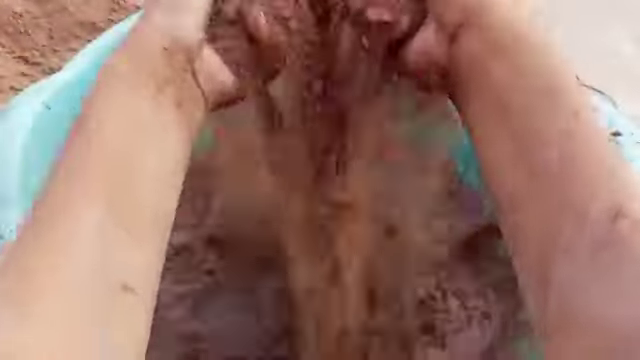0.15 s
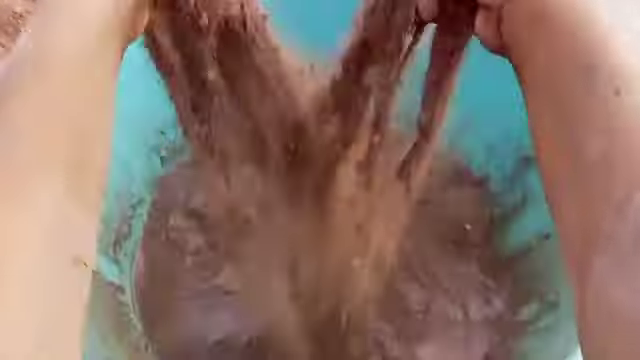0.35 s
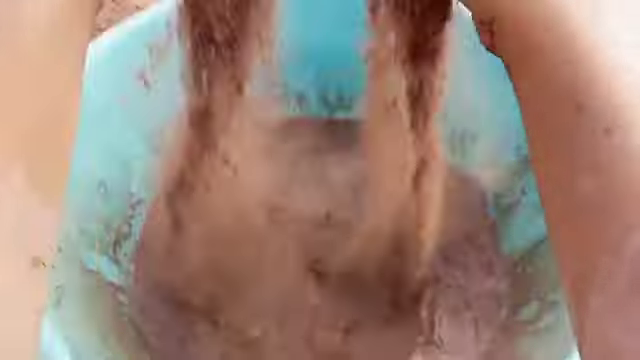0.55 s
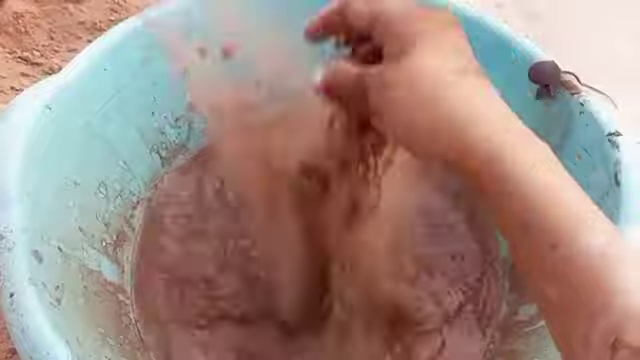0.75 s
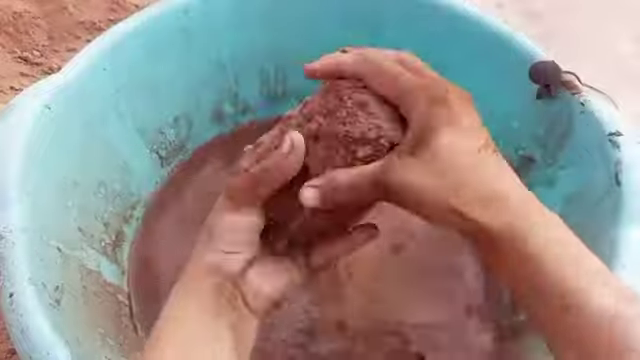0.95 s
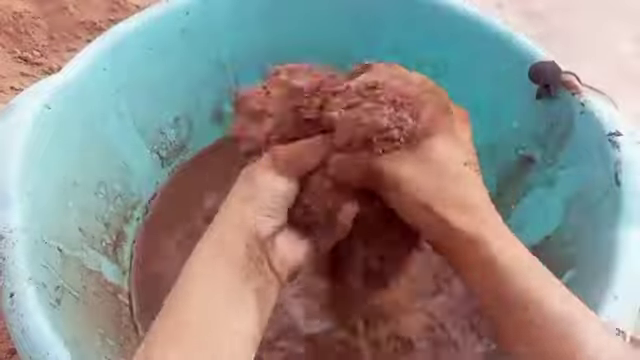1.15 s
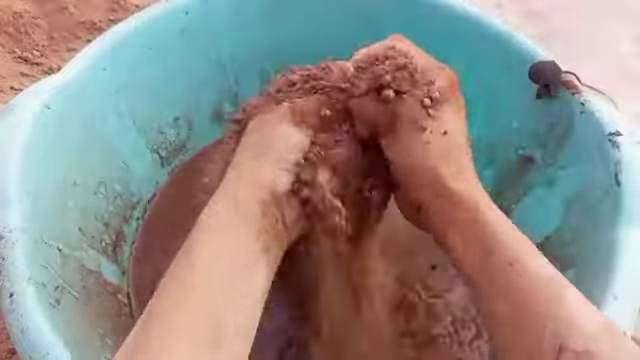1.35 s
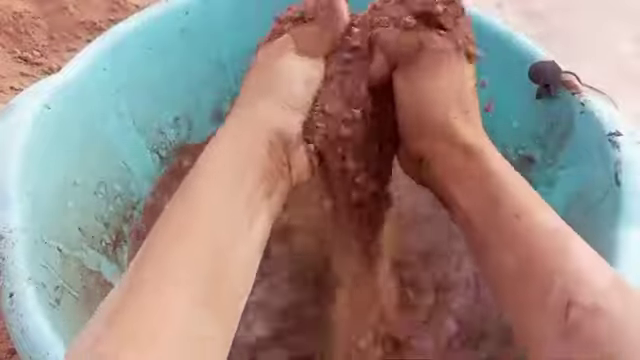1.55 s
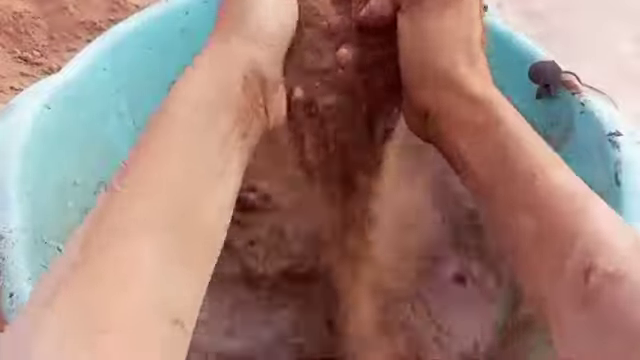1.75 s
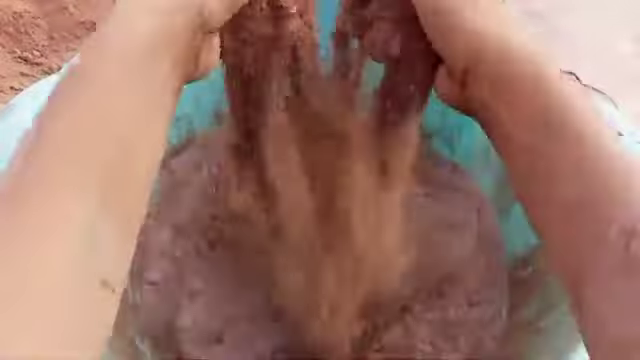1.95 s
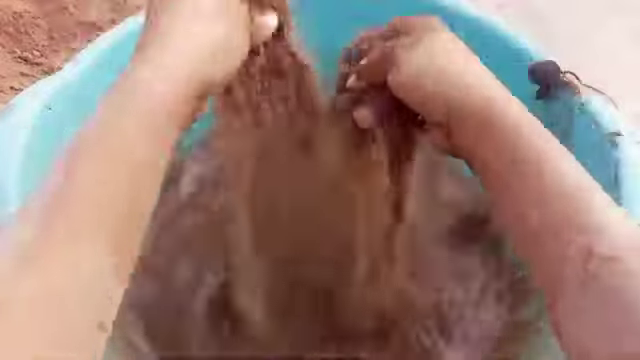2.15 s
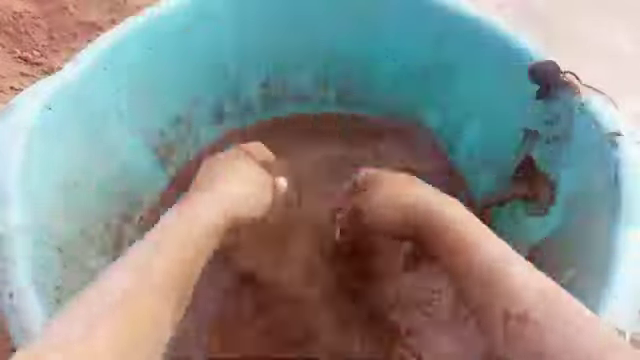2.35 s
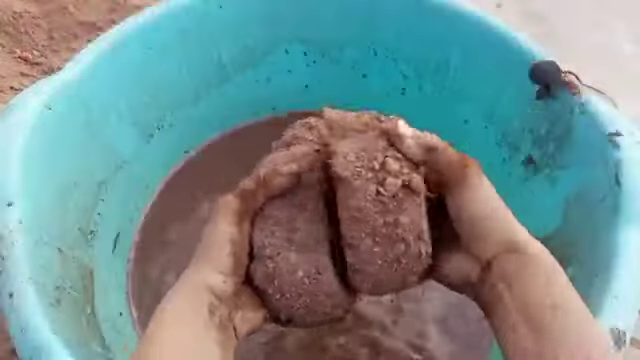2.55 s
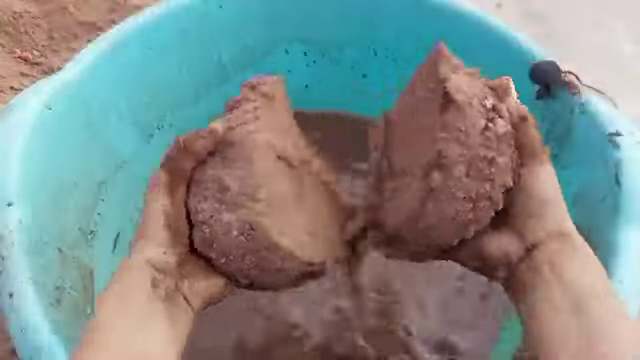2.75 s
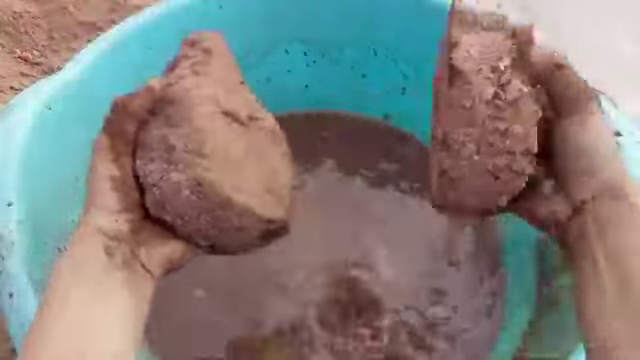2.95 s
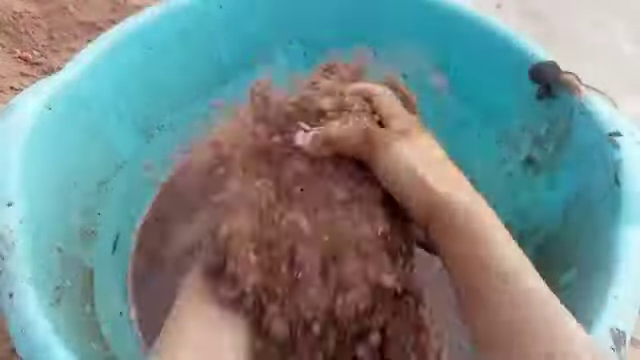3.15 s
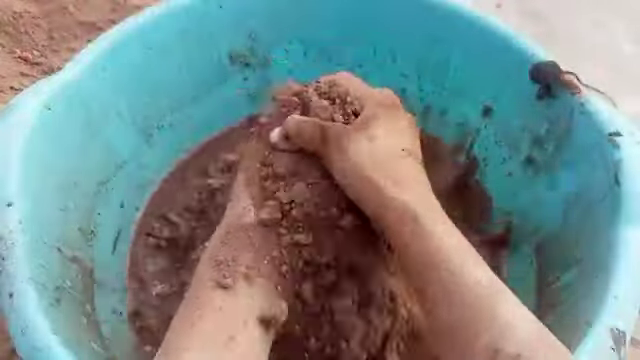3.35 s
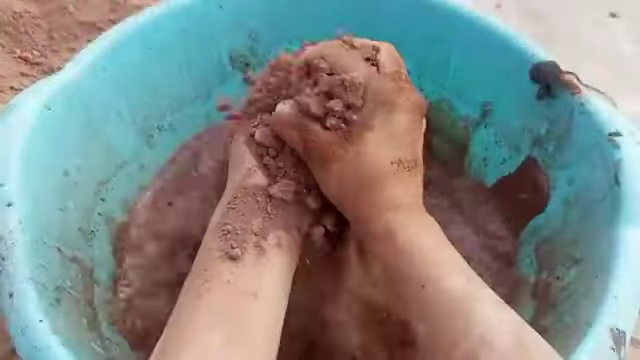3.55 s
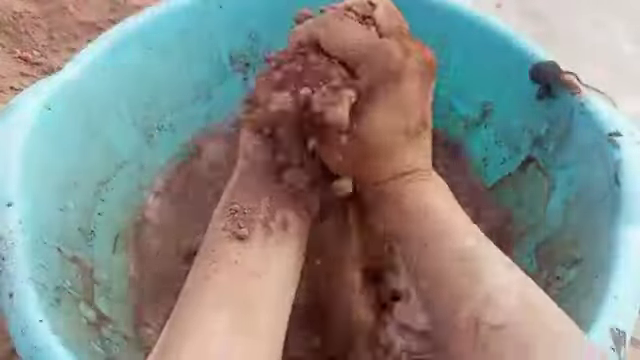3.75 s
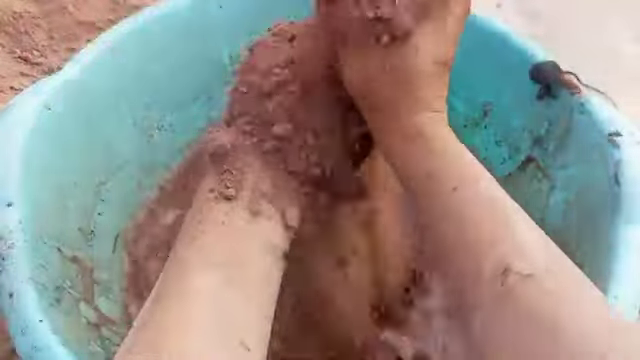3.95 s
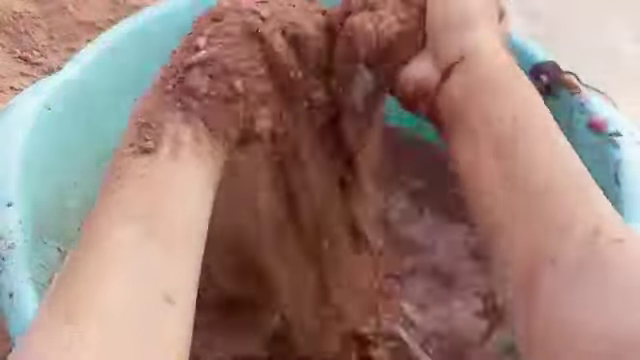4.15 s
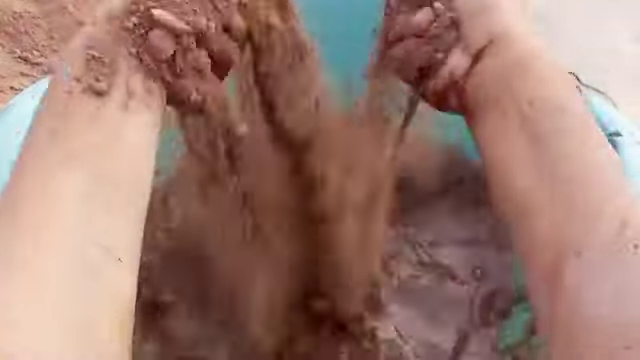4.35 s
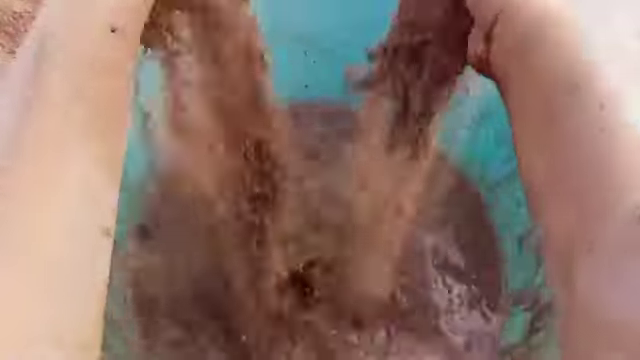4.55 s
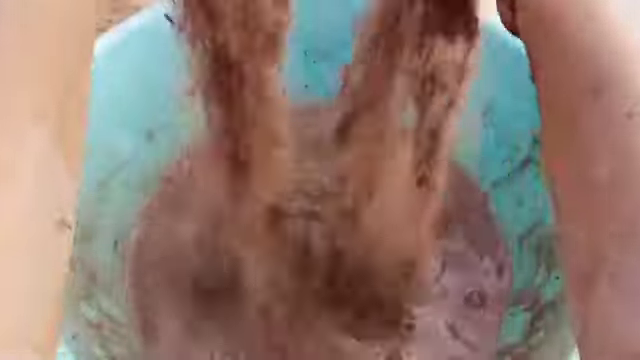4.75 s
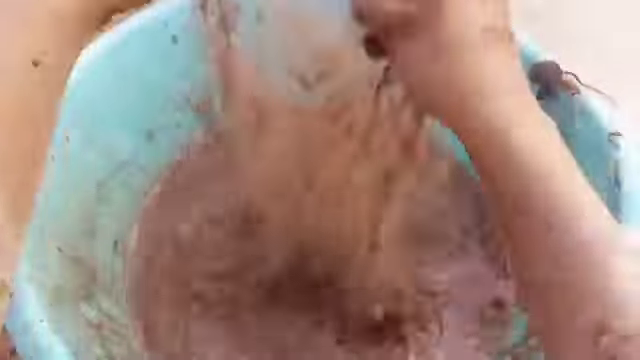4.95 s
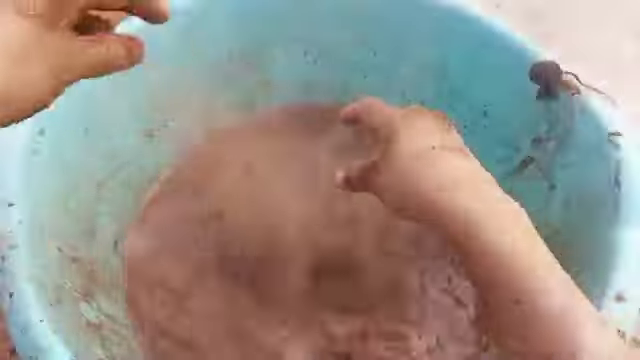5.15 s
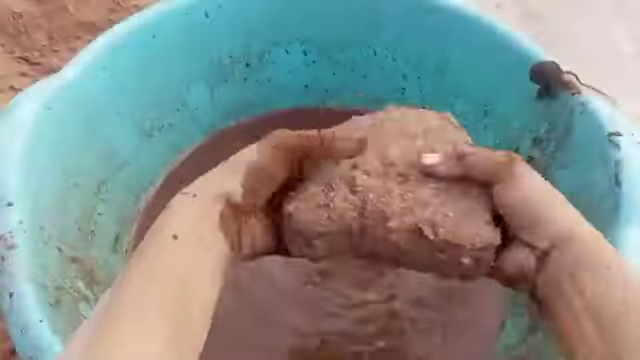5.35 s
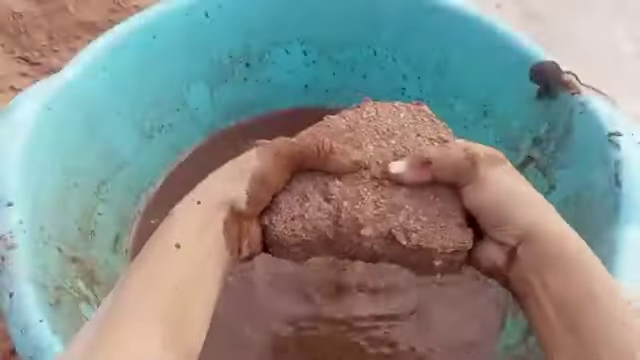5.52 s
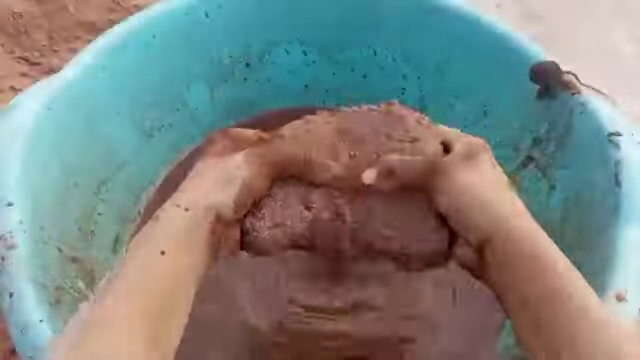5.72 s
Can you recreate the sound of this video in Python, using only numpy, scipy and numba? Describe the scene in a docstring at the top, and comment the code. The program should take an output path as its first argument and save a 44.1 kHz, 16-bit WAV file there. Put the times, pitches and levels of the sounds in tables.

```python
"""At a plastic tub of muddy water, two hands crush lumps of wet gritty sand close to the microphone.
Snapping lumps and rubbing sand are bursts and streams of filtered random grain ticks.
Sand pours into the water: swelling, dying sines make the bubbles, which gurgle, fizz and ring in the tub.
Just past half-way a whole lump plops in: a slap, throbbing air pockets, decaying noise for wash and spray."""
import sys
import numpy as np
from scipy import signal
from scipy.fft import rfft, irfft
from scipy.io import wavfile
from scipy.ndimage import uniform_filter1d, map_coordinates
from numba import njit

SR = 44100
rng = np.random.default_rng(int(sys.argv[2]) if len(sys.argv) > 2 else 0)


def to_wav(s):
    """Save 16-bit WAV."""
    ch = np.atleast_2d(s).T  # columns
    pcm = np.round(np.clip(ch, -1, 1) * 32767)  # PCM
    wavfile.write(sys.argv[1], SR, pcm.astype(np.int16))


N = 259308
CUTOFF_HZ = 15150

# Colour of sand grains rubbing. Each row: frequency in Hz, relative spectral level in dB.
GRIT_COLOUR = [(300, -29), (1000, -0.5), (3000, -1.5), (6200, 4), (8200, -0.5), (9600, 11.5), (10700, 7),
               (12000, -2), (13800, -5), (14900, 3), (15600, 6.5)]
# Colour of fine sand and small bubbles. Each row: frequency in Hz, relative spectral level in dB.
FIZZ_COLOUR = [(900, -12.5), (1700, 0.5), (2300, -4), (3300, 1), (5900, 0), (6800, -3), (8000, -14),
               (9900, -6), (12500, -24), (14900, -8.5)]
# Slap and throbbing air pockets of the whole lump. Each row: start in seconds, initial pitch in Hz,
# envelope peak in dB, swell time in seconds, pitch rise per swell time as a fraction.
PLOP_PARTS = [(3.2752, 1300, -0.5, 0.00044, 0.012), (3.2750, 710, -3, 0.0012, 0.011),
              (3.274, 144, -21.5, 0.0069, 0.00032), (3.273, 72, -22.5, 0.0036, 0.0),
              (3.2772, 297, 2.5, 0.0028, 0.017), (3.297, 321, -14.5, 0.007, 0.012),
              (3.332, 270, -21.5, 0.0071, 0.016)]


def from_db(db):
    """Decibels to gain."""
    return 10 ** (np.asarray(db) / 20)


def rms_one(x):
    """Scale to unit rms."""
    return x / np.sqrt(np.mean(x ** 2) + 1e-20)


def white_noise():
    """Gaussian noise over the whole scene."""
    return rng.standard_normal(N)


def filtered(x, kind, hz, order=2):
    """Butterworth filter; kind is low, high or band."""
    return signal.sosfilt(signal.butter(order, hz, kind, fs=SR, output="sos"), x)


def curve(table):
    """Interpolate rows of (seconds, value) to one value per sample."""
    s, values = np.transpose(table)
    return np.interp(np.arange(N) / SR, s, values)


def gain_at(colour, hz):
    """Gain of a colour at the given frequencies, interpolated over log frequency."""
    knots_hz, db = np.transpose(colour)
    return from_db(np.interp(np.log(hz + 1), np.log(knots_hz), db))


def coloured(x, colour, size=1024):
    """Causal (minimum-phase) filter with the given colour, built from its cepstrum; rms 1."""
    cepstrum = irfft(np.log(gain_at(colour, np.fft.rfftfreq(size, 1 / SR))))
    cepstrum[1:size // 2] *= 2
    cepstrum[size // 2 + 1:] = 0
    impulse = irfft(np.exp(rfft(cepstrum)))
    return rms_one(signal.fftconvolve(x, impulse)[:N])


def drift(per_s):
    """Random wander of rms 1 through per_s random values a second."""
    position = np.arange(N) / SR * per_s
    return rms_one(np.interp(position, np.arange(N), rng.standard_normal(N)))


def evened(x, window_s=0.066):
    """Hold a stream of grains near rms 1 while its fine texture stays."""
    size = int(window_s * SR / 2) + 1
    power = uniform_filter1d(uniform_filter1d(x ** 2, size), size)
    return x / np.sqrt(np.abs(power) + 1e-3 * np.mean(x ** 2))


def fall(start_s, length_s):
    """Envelope of one fall of sand: fast attack, sagging hold, release that is steeper for short falls."""
    attack_s, sag_db_per_s = 0.014, 14
    release_db_per_s = 260 * np.sqrt(0.1 / length_s)   # 260 for a fall of 0.1 s
    age_s = np.maximum(np.arange(N) / SR - start_s, 0)
    loss_db = sag_db_per_s * age_s + release_db_per_s * np.maximum(age_s - length_s, 0)
    return np.minimum(age_s / attack_s, 1) * from_db(-np.minimum(loss_db, 120))


def after_plop(decay_s):
    """Exponential decay from the slap of the whole lump."""
    age_s = np.arange(N) / SR - PLOP_PARTS[0][0]
    return (age_s > 0) * np.exp(-np.abs(age_s) / decay_s)


def swell_time(hz):
    """Swell time in seconds: the larger the bubble, the longer it rings."""
    return 0.0016 * (1450 / hz) ** 0.82


@njit
def ring_bubbles(start_s, hz, height, swell_s, rise, sharpness):
    """Each bubble is a sine that swells as it pinches off, dies away and shifts in pitch by its rise."""
    out = np.zeros(N)
    for k in range(len(start_s)):
        first = int(start_s[k] * SR)
        last = min(first + int(swell_s[k] * SR * (3 + 7 / sharpness)), N)
        for i in range(max(first, 0), last):
            age = (i - first) / SR / swell_s[k]   # in swell times
            phase = 2 * np.pi * hz[k] * swell_s[k] * age * (1 + rise[k] * age / 2)
            out[i] += height[k] * (age * np.exp(1 - age)) ** sharpness * np.sin(phase)
    return out


def bubble_cloud(colour, births, low_hz, high_hz, cycles, spread_db, rise, favour_db, count):
    """Bubbles of random pitch and size; the heavier the flow, the more of them, until they merge."""
    when, place = rng.random((2, count))
    size, damping, climb = rng.standard_normal((3, count))
    fallen = np.cumsum(births)
    start_s = np.interp(when * fallen[-1], fallen, np.arange(N) / SR)
    hz = low_hz * (high_hz / low_hz) ** place
    # small bubbles ring for more cycles
    swell_s = cycles / hz * (hz / 2000) ** 0.09 * np.exp(0.5 * damping)
    # favoured pitches change some 14 times a second
    grid = rng.standard_normal((128, 32))
    favoured = map_coordinates(grid, [start_s * 14, place * 24], order=1, mode="wrap")
    size_db = spread_db * np.minimum(size, 2.2) + favour_db * favoured
    height = gain_at(colour, hz) * np.sqrt(hz / swell_s) * from_db(size_db)
    return ring_bubbles(start_s, hz, height, swell_s, rise * (1 + climb), 1.6)


def grit(colour=GRIT_COLOUR, per_s=7000, spread_db=8.5):
    """Sand grains slip and tick: random impulses of random size, coloured; rms 1."""
    ticks = (rng.random(N) < per_s / SR) * rng.choice([-1, 1], N)
    size_db = spread_db * np.minimum(rng.standard_normal(N), 3)
    return coloured(ticks * from_db(size_db), colour)


def background(level_db=-54):
    """Steady coloured noise under everything."""
    # Each row: frequency in Hz, relative spectral level in dB.
    floor_colour = [(25, -10), (80, 5.5), (400, -1), (700, 1), (1300, -18), (2000, -14), (4000, -30),
                    (8000, -14), (10000, -1), (15000, -18)]
    return from_db(level_db) * coloured(white_noise(), floor_colour, size=8192)


def surroundings(x, room_db=-16.0, t60_s=0.13, wall_hz=6000):
    """The tub and the space around it add a short, dull tail of decaying noise."""
    t = np.arange(SR // 2) / SR
    tail = rng.standard_normal(len(t)) * from_db(-60 * t / t60_s) * (t > 0.002)
    tail = filtered(tail, "low", wall_hz, order=1)
    return x + from_db(room_db) * signal.fftconvolve(x, tail / np.linalg.norm(tail))[:N]


def moving_echoes(x, echo_db=-7, count=4):
    """Hands, arms, tub wall and heaving water reflect from close by; their paths keep changing."""
    now, out = np.arange(N), x.copy()
    for delay_s in np.geomspace(0.0008, 0.0048, count):
        path = delay_s * SR * (1 + 0.12 * drift(7))
        out += from_db(echo_db) * np.interp(now - path, now, x)
    return out


def tub(x, direct_db=-7.0, width_hz=160, wander_db=4.0, wander_per_s=9):
    """The tub's air resonances ring with the water; each swells and fades as the landing spot moves."""
    resonances_hz = [590, 1170, 1660, 2330, 3230, 4220, 4850, 5520, 6050]   # one frequency in Hz each
    radius = np.exp(-np.pi * width_hz / SR)
    out = from_db(direct_db) * x
    for hz in resonances_hz:
        poles = [1, -2 * radius * np.cos(2 * np.pi * hz / SR), radius ** 2]
        ringing = signal.lfilter([1, 0, -1], poles, x) * (1 - radius ** 2) / 2
        out = out + from_db(wander_db * drift(wander_per_s)) * ringing
    return out


def rumble(level_db=-56.0, low_hz=80, high_hz=210):
    """The tub rumbles softly, as low noise, while a lump is lifted or pulled apart."""
    # Each row: start in seconds, length in seconds.
    lifts = [(2.76, 0.28), (5.544, 0.38)]
    noise = rms_one(filtered(white_noise(), "band", [low_hz, high_hz]))
    return from_db(level_db) * noise * sum(fall(s, length_s) for s, length_s in lifts)


def slosh(gurgle_level, lapping_db=-56.5, share_db=-39):
    """Unsteady low noise: the water laps and is stirred by coarse sand."""
    # Each row: frequency in Hz, relative spectral level in dB.
    slosh_colour = [(25, -30), (75, -31), (105, -9), (150, 5.5), (200, -2), (280, 5.5), (420, 3.5),
                    (700, -13.5)]
    level = np.hypot(from_db(lapping_db), from_db(share_db) * gurgle_level)
    uneven = white_noise() * from_db(2.4 * drift(40))
    return level * coloured(uneven, slosh_colour, size=8192)


def dust(flow_db, share_db=-12.0, most_db=-41.5):
    """The finest sand sifts with a smooth hiss that follows the flow up to a ceiling."""
    level_db = np.minimum(flow_db + share_db, most_db)
    return from_db(level_db) * coloured(white_noise(), FIZZ_COLOUR)


def foam(fizz_level, births, level_db=-38.5, at_fizz_db=-20.5, follows=0.56):
    """The tiniest bubbles burst in a soft, grainy sizzle that swings less than the fizz."""
    cloud = bubble_cloud(FIZZ_COLOUR, births, low_hz=7000, high_hz=15200, cycles=4.0,
                         spread_db=7.0, rise=0.002, favour_db=4.0, count=6000)
    return from_db(level_db) * (fizz_level / from_db(at_fizz_db)) ** follows * evened(cloud)


def crumbs(per_s=130, thin_hz=6500):
    """Single grains tick, thin and high, under the fingers that hold and turn a lump."""
    # Each row: start in seconds, length in seconds, relative level in dB.
    grips = [(2.839, .3, -47), (5.41, 0.42, -51)]
    held = sum(from_db(db) * fall(s, length_s) for s, length_s, db in grips)
    return held * filtered(grit(per_s=per_s, spread_db=4.5), "high", thin_hz)


def burble(level_db=3.0, gap_cycles=3.4, swell_cycles=0.98, scatter_octaves=0.23, spread_db=2.5,
           rise=0.011, count=32):
    """Each heave of the water frees a quick, uneven run of large air pockets of about one size."""
    # Each row: start in seconds, length in seconds, relative level in dB, mean glug pitch in Hz.
    heaves = [(0.01, 0.097, -30, 480), (0.185, 0.073, -33, 428), (0.275, 0.052, -34, 300),
              (0.279, 0.16, -45, 140), (1.602, 0.063, -33.5, 392), (1.96, .17, -38.5, 402),
              (2.394, 0.17, -37.5, 429.6), (3.437, 0.05, -24, 318), (3.44, 0.11, -41, 140.4),
              (3.524, 0.079, -22, 500.6), (3.667, .02, -28.5, 346), (3.754, .08, -40.5, 235),
              (3.895, 0.081, -32.5, 548), (4.146, 0.14, -43, 599), (4.492, 0.1, -33, 431.6),
              (4.715, .06, -39, 135), (4.862, 0.089, -31, 551), (5.039, 0.083, -33.5, 657),
              (5.554, 0.26, -50.5, 392)]
    out = np.zeros(N)
    for s, length_s, db, hz in heaves:
        slip, tone, size = rng.standard_normal((3, count))
        age_s = (np.arange(count) + 0.295 * slip) * gap_cycles / hz
        pitch_hz = hz * 2 ** (scatter_octaves * tone)
        height = from_db(db + level_db + spread_db * size) * (age_s < length_s)
        swell_s = swell_cycles / pitch_hz
        out += ring_bubbles(s + age_s, pitch_hz, height, swell_s, np.full(count, rise), 0.79)
    return out


def spray(level_db=-28.5, decay_s=0.014):
    """Fine drops fly up where the lump goes in: a decaying burst of grain ticks."""
    return from_db(level_db) * after_plop(decay_s) * grit()


def churn(level_db=-23.0, decay_s=0.022, low_hz=220, high_hz=1100):
    """Water closes roughly over the sunken lump: a decaying burst of noise."""
    wash = rms_one(filtered(white_noise(), "band", [low_hz, high_hz]))
    return from_db(level_db) * after_plop(decay_s) * wash


def plop():
    """The lump slaps the water, then the large air pocket behind it throbs."""
    s, hz, db, swell_s, rise = np.transpose(PLOP_PARTS)
    return ring_bubbles(s, hz, from_db(db), swell_s, rise, 1.0)


def clear_bubbles_and_ticks(level_db=-1.5, rise=0.0016, linger_db=-14.0, linger_s=0.003):
    """Bubbles, and a few high gravel ticks, that stand out of the cloud: a quick pop, then a softer ring at the
    same pitch."""
    # Each row: start in seconds, pitch in Hz, relative peak in dB.
    pops_and_ticks = [(0.105, 10050, -6), (0.122, 2230, -14), (0.242, 1290, -18.5), (0.275, 2524, -14.5),
                      (0.391, 1970, -15.5), (0.417, 6080, -2), (0.477, 5850, -0.5), (0.594, 906, -20),
                      (0.652, 4280, -22), (0.77, 4070, -9), (1.017, 3600, -7), (1.057, 1183, -13.5),
                      (1.513, 710, -13.5), (1.565, 1330, -18), (1.874, 1060, -15.5), (1.8852, 4980, -5),
                      (1.956, 852, -12), (2.147, 14400, -6), (2.186, 3210, -4.5), (2.321, 2760, -11),
                      (2.387, 1250, -13), (2.457, 1690, -8.5), (2.475, 3920, -8.5), (2.549, 3320, -8.5),
                      (2.662, 4000, -10.5), (3.674, 534, -19), (3.748, 1330, -19.5), (3.942, 1070, -22.5),
                      (4.039, 1117, -17.5), (4.086, 1830, -24), (4.142, 3560, -17.5), (4.144, 10940, -10),
                      (4.218, 5740, -13.5), (4.236, 1590, -22), (4.378, 4240, -12.5), (4.409, 1700, -23),
                      (4.508, 310, -22), (4.511, 580, -20.5), (4.516, 1185, -13), (4.545, 2190, -16),
                      (4.712, 10630, -4), (4.781, 4420, -11), (4.783, 14400, -4), (4.796, 1530, -17.5),
                      (4.813, 534, -23), (4.87, 520, -16.5), (4.943, 1162, -20.5), (5.002, 3110, -8),
                      (5.04, 1060, -18), (5.059, 1074, -18.5), (5.122, 1250, -14), (5.152, 6030, -11.5),
                      (5.174, 5700, -9.5), (5.274, 2360, -19), (5.334, 418, -21), (5.46, 1090, -39),
                      (5.573, 5030, -27)]
    s, hz, db = np.transpose(pops_and_ticks)
    height, climb = from_db(db + level_db), np.full(len(s), rise)
    pop = ring_bubbles(s, hz, height, swell_time(hz), climb, 1.28)
    ring = ring_bubbles(s, hz, height, np.full(len(s), linger_s), climb, 0.74)
    return pop + from_db(linger_db) * ring


def smacks(level_db=-1.0, scatter_db=-28.0, swell_share=0.38):
    """Clods (low) and gravel (high) open cavities that barely ring, scattered by hands and tub."""
    # Each row: start in seconds, pitch in Hz, relative peak in dB.
    impacts = [(0.018, 1100, -11.5), (0.0665, 4507, -8), (0.4227, 4870, -2.5), (0.43, 5500, -7),
               (0.4415, 5000, -2.5), (0.477, 1340, -6.5), (0.516, 3680, -5.5), (0.594, 3270, -12),
               (0.7914, 3420, -3.5), (0.831, 5060, -3), (1.037, 5570, -3), (1.121, 10300, -8.5),
               (1.4726, 1080, -12.5), (1.559, 1210, -3), (1.603, 4300, -3), (1.609, 3360, -2.5),
               (1.619, 730, -5), (1.629, 1870, -6.5), (1.6975, 5380, -3.5), (1.807, 5300, -3),
               (1.891, 4600, -4), (1.985, 6260, 1), (2.04, 5700, 1), (2.0517, 5000, -9), (2.068, 4210, -6),
               (2.195, 9400, -1), (2.339, 5000, 2), (2.374, 5500, 2), (2.4126, 9600, -1),
               (2.4728, 5230, -1), (2.565, 4020, -3), (2.663, 2530, -15), (3.368, 530, -4),
               (3.368, 1770, 2), (3.411, 1360, -1.5), (3.421, 1120, -4), (3.433, 1290, 1.5),
               (3.441, 1130, 4.5), (3.444, 453, -2), (3.5463, 5740, 0), (3.587, 1300, -5),
               (3.625, 6450, -4), (3.6715, 6630, -6), (3.7977, 6160, -6.5), (3.91, 6330, -8),
               (4.511, 4210, -0.5), (4.516, 3630, -3.5), (4.59, 1780, -9.5), (4.619, 3660, -11),
               (4.906, 6040, -4), (5.209, 4740, -8.5)]
    s, hz, db = np.transpose(impacts)
    swell_s = swell_share * swell_time(hz)
    hits = ring_bubbles(s, hz, from_db(db + level_db), swell_s, np.zeros(len(s)), 1.39)
    return moving_echoes(hits, scatter_db)


def snaps(level_db=6.0, dull_hz=5000, thin_hz=2600, decay_s=0.0019, size=600):
    """A crack runs through a lump: a decaying burst of noise, duller where the sand is soaked."""
    # Each row: start in seconds, relative peak in dB, wetness from 0 to 1.
    cracks = [(0.07, -13, 0.8), (0.2751, -1.5, 0.0), (0.982, -9.5, 0.06), (1.019, -10, 0.64),
              (1.4718, -11.5, 0.4), (1.5, -16, 0.16), (1.617, -4.5, 0.35), (1.954, -4, 0.34),
              (2.661, -19, 0.37), (3.074, -28, 0.15), (3.104, -32, 0.2), (3.138, -23, 0.65),
              (3.16, -23, 0.05), (3.37, -9, 0.66), (3.466, -5.5, 0.16), (3.584, -10.5, 0.55),
              (3.737, -6.5, 0.0), (3.827, -14.5, 0.38), (5.659, -26, 0.0), (5.691, -14, 0.0),
              (5.701, -19, 0.03), (5.714, -32, 0.4), (5.805, -31.5, 0)]
    out, noise = np.zeros(N), coloured(white_noise(), GRIT_COLOUR)
    soaked = rms_one(filtered(noise, "band", [dull_hz / 2.85, dull_hz]))
    dry_sand = rms_one(filtered(noise, "high", thin_hz))
    burst = np.exp(-np.arange(size) / SR / decay_s)
    for s, db, wetness in cracks:
        span = slice(int(s * SR), int(s * SR) + size)
        wet = np.clip(wetness, 0, 1)
        crack = ((1 - wet) * dry_sand[span] + wet * soaked[span]) * burst
        out[span] += from_db(db + level_db) * crack / np.abs(crack).max()
    return out


def clod_surge(decay_s=0.0045, size=3000):
    """Gain of the flow: clods that land at once change it abruptly for a few milliseconds."""
    # Each row: start in seconds, initial gain change in dB.
    clods = [(0.24, -4), (0.387, 3), (0.856, 8.5), (1.117, 3), (1.473, 15), (1.559, 3), (2.039, 7),
             (4.302, 8), (2.188, 6), (2.338, 2), (2.549, 5), (4.235, 7), (4.324, 11), (4.494, 10),
             (4.509, 6), (4.739, 10)]
    surge_db = np.zeros(N + size)
    for s, db in clods:
        first = int(s * SR)
        surge_db[first:first + size] += db * np.exp(-np.arange(size) / SR / decay_s)
    return from_db(surge_db[:N])


def pour(sputter_db=1.97, sputter_per_s=20, trickle_gurgle_db=-4.5, trickle_crunch_db=-2.5):
    """Levels of gurgle, fizz and crunch, which share the power of an uneven trickle and each handful."""
    # Thin stream between handfuls. Each row: time in seconds, relative level in dB.
    trickle = [(0, -31.5), (.87, -30), (.92, -39), (1.12, -36), (1.16, -54), (1.45, -44), (1.52, -30),
               (2.53, -28.5), (2.63, -58), (3.34, -61), (3.5, -27.5), (4.07, -33), (4.125, -43),
               (4.16, -32.5), (5.3, -32), (5.44, -48), (5.64, -57), (5.88, -54)]
    # Falling handfuls. Each row: start in seconds, length in seconds, relative level in dB,
    # gurgle of coarse lumps in dB relative to fizz, crunch in the hands in dB relative to fizz.
    handfuls = [(0.0, .13, -24, 2, -5.5), (0.234, .085, -33, 15, -13.5), (0.385, .16, -24, -3.5, -26),
                (0.601, .08, -31, 9, 2), (0.715, .11, -23, -3, -12), (0.925, .04, -33, -16, -3),
                (0.958, .14, -23, -4, -10.5), (1.165, .07, -41, -24, -3), (1.241, .065, -33, -5, -5),
                (1.34, .11, -39.5, 4, -9), (1.512, .17, -20.5, 0.5, -6), (1.774, .03, -24.5, 3, -5),
                (1.868, .04, -26, 1, -5), (1.95, .16, -20, 0.5, -5.5), (2.131, .08, -22.5, -10, 5.5),
                (2.24, .09, -26, -1, -5.5), (2.37, .1, -18.5, -1, -8), (2.54, .04, -21.5, 3.5, -12),
                (2.645, .02, -27, -14, -7), (2.8, .04, -53, -7, -8), (3.064, .06, -42.5, 2, 8),
                (3.364, .24, -19, 5, -8.5), (3.416, .04, -14.5, 4, -6.5), (3.62, .19, -25.5, 1, -7),
                (3.892, .05, -33, 3, -18), (3.98, .04, -27, -2, -18), (4.205, .05, -35, -1, 2),
                (4.395, .035, -33, -18, -15), (4.503, .112, -22.5, -6.5, -7.5), (4.783, .15, -24.5, 5, 0.5),
                (5.029, .1, -24.5, -4, -4), (5.14, .08, -25, -34, -8), (5.33, .035, -28, -4, 6.5),
                (5.47, .11, -43.5, -7, 3), (5.686, .035, -43, -17, 7), (5.825, .035, -40.5, -12, -9)]
    trickle_level = from_db(curve(trickle) + sputter_db * drift(sputter_per_s))
    falls = [(trickle_level, trickle_gurgle_db, trickle_crunch_db)]
    for s, length_s, db, gurgle_db, crunch_db in handfuls:
        falls.append((from_db(db) * fall(s, length_s), gurgle_db, crunch_db))
    power = 0
    for level, gurgle_db, crunch_db in falls:
        shares = from_db([gurgle_db, 0, crunch_db]) ** 2
        power = power + np.outer(shares / shares.sum(), level ** 2)
    return np.sqrt(power)


def hands_and_water(crumbling, bubbles, clumping):
    """Blend sand crumbling close by with bubbles that ring in the tub, each held near rms 1."""
    # Power share straight from the hands, the rest from the water.
    # Each row: time in seconds, share from 0 to 1.
    hand_share = [(0.05, 0.5), (.2, 0.15), (1.2, .1), (1.26, 0.83), (2.08, .55), (2.25, 0.15), (3.42, 0.63),
                  (3.8, 0.57), (3.92, .04), (5.3, 0.06), (5.42, .5)]
    share = np.clip(curve(hand_share), 0, 1)
    hands = evened(crumbling * clumping)
    water = evened(tub(moving_echoes(bubbles * clumping)))
    return np.sqrt(share) * hands + np.sqrt(1 - share) * water


def fizz(level, births, clumps):
    """Fine sand crumbles and frees small, high bubbles."""
    small = bubble_cloud(FIZZ_COLOUR, births, low_hz=1800, high_hz=7600, cycles=3.0,
                         spread_db=6.5, rise=0.003, favour_db=3.2, count=5500)
    return level * hands_and_water(grit(FIZZ_COLOUR, spread_db=5.0), small, from_db(3.03 * clumps))


def gurgle(level, births, clumps):
    """Coarse lumps crumble and trap large, low bubbles."""
    # Colours of the bubbles and of crumbling lumps. Each row: frequency in Hz, relative level in dB.
    gurgle_colour = [(230, -4.5), (350, -5.5), (540, 2), (850, -4.5), (1200, 1), (2300, -2.5), (3000, -22)]
    crumble_colour = [(150, -17), (380, -1.5), (1500, 1), (2300, -3.5), (3200, -17.5)]
    large = bubble_cloud(gurgle_colour, births, low_hz=240, high_hz=2800, cycles=2.6,
                         spread_db=5.5, rise=0.016, favour_db=2.8, count=4200)
    crumbling = grit(crumble_colour, spread_db=5.5)
    return level * from_db(-0.36) * hands_and_water(crumbling, large, from_db(2.57 * clumps))


def flutter(x, depth_db=4.0, per_s=90, count=12):
    """Bursts of grains favour other pitches: neighbouring bands flare up on their own."""
    spectrum = rfft(x)
    place = np.fft.rfftfreq(N, 1 / SR) / CUTOFF_HZ * count
    out = np.zeros(N)
    for k in range(count + 1):
        band = irfft(spectrum * np.maximum(1 - np.abs(place - k), 0), N)
        out += from_db(depth_db * drift(per_s)) * band
    return out


def crunch(level, clumps):
    """Gritty sand grinds in the hands: clumped, fluttering grain ticks with close echoes."""
    grinding = flutter(grit()) * from_db(4.5 * clumps)
    return level * from_db(3.0) * evened(moving_echoes(grinding))


def scene():
    """Sand falls in clumps, so gurgle, fizz and crunch surge together."""
    gurgle_level, fizz_level, crunch_level = pour()
    flow = np.sqrt(gurgle_level ** 2 + fizz_level ** 2 + crunch_level ** 2)
    clumps, births = drift(105), flow + 0.12
    stream = gurgle(gurgle_level, births, clumps) + fizz(fizz_level, births, clumps)
    stream = stream + crunch(crunch_level, clumps)
    sand = filtered(clod_surge() * stream, "high", 215)
    sand = sand + foam(fizz_level, births) + dust(20 * np.log10(flow)) + spray()
    sand = sand + clear_bubbles_and_ticks() + smacks() + snaps() + crumbs()
    water = burble() + plop() + churn() + rumble() + slosh(gurgle_level)
    return (surroundings(sand) + water + background())[None]


def record(dry):
    """The loudest peaks overload; the top is cut."""
    clipped = np.clip(dry, -1, 1)
    return signal.sosfilt(signal.ellip(10, 0.2, 80, CUTOFF_HZ, fs=SR, output="sos"), clipped)


dry = scene()
out = record(dry)
to_wav(out)
```